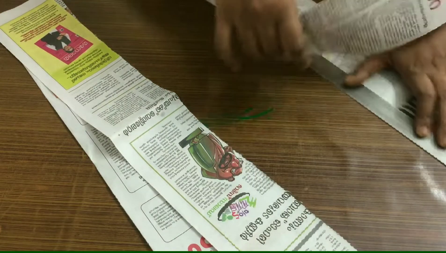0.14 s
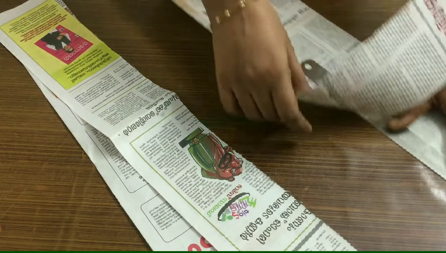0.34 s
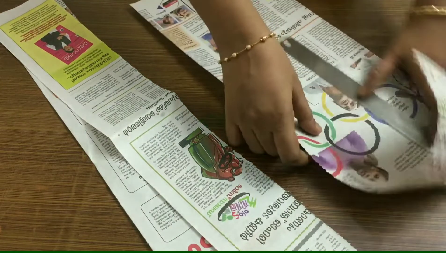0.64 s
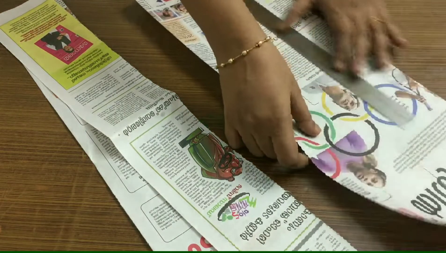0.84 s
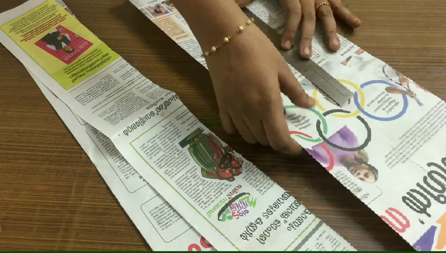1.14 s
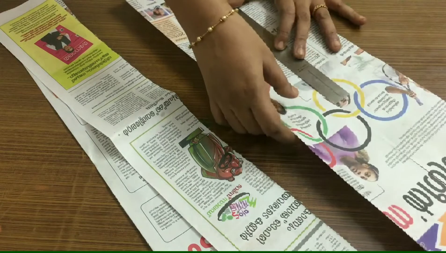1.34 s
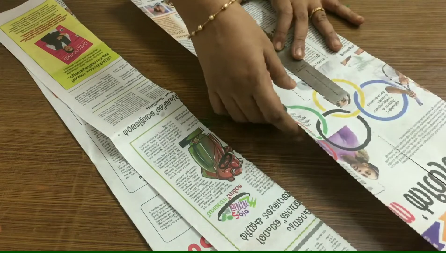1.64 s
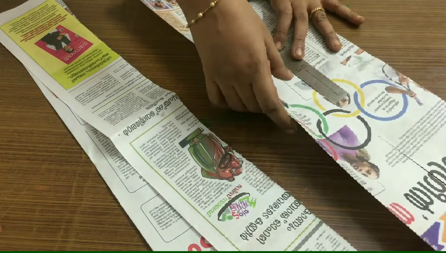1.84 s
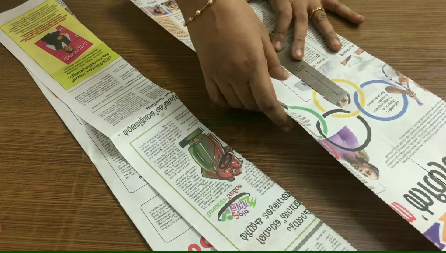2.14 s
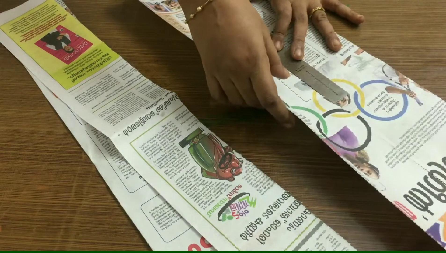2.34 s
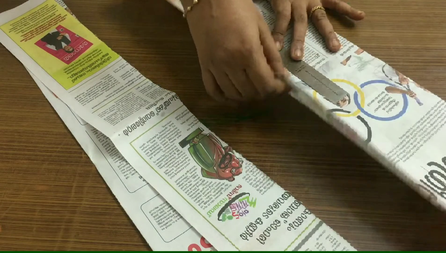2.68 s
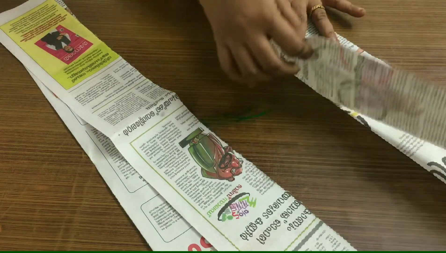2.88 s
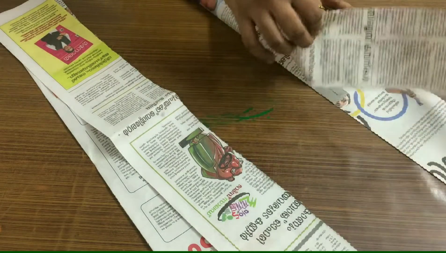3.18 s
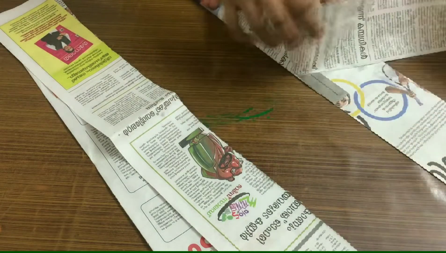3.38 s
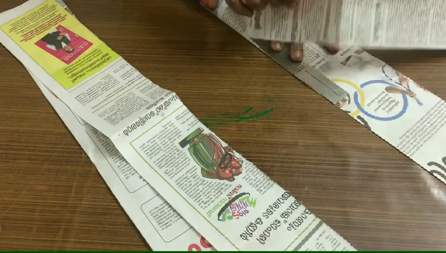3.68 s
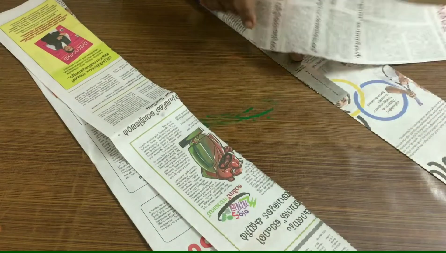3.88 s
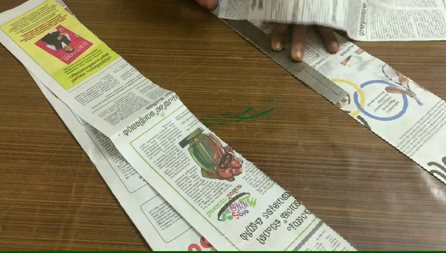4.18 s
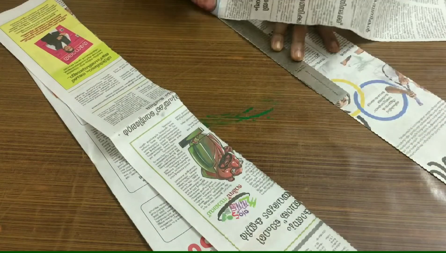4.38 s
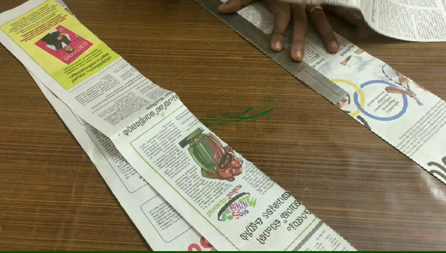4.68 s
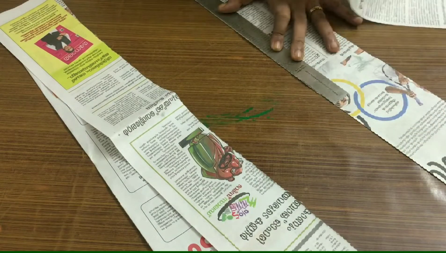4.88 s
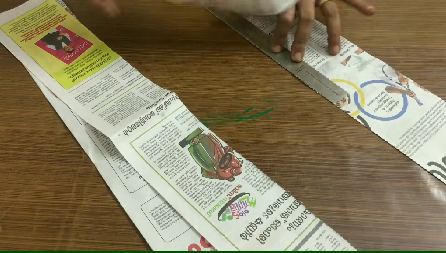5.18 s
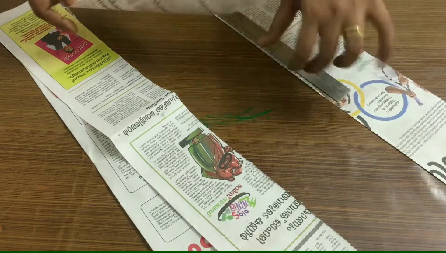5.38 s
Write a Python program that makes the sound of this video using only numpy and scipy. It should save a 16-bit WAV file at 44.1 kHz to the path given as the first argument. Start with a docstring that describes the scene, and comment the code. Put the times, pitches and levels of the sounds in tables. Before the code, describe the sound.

A quiet indoor room with faint low rumble and a short reverberant tail; paper is very close. The sheet slides and rustles at once, pops at 0.18 s, then rips briefly from 0.2 to 0.34 s with a sharp crack. From 0.5 to 1.3 s soft hand landings make low table booms, while the palm smooths the page with airy hiss and a low rub. It fades to near silence from about 1.6 to 3 s, with a couple of tiny ticks and a barely audible low hum near 2.6 s. From 3.1 s the paper crinkles and ticks under fingers. Crisp, fibrous tears follow at 3.52-3.67, 3.94-4.07, 4.32-4.44 and 4.93-5.12 s, with bright snaps and hollow buckling pops around them, strongest near 3.9 s. Crumpling at 4.85 s and small jerks precede the weaker last tear, which ends in a flick. The sheet slides softly around 5.4 s.

```python
"""A bare, quiet room: newspaper is torn along a steel ruler on a wooden table, in five short pulls, close up.
Each pull is a rush of snapping fibres radiated by the free strip, often after a few jerks and with cracks,
and it drags the sheet along. Between pulls the sheet buckles, ticks and slides over the table, and a hand
smooths it flat. Clicks and noise through resonances make the paper, wavering sines the table's boom;
a reverberant tail and a faint rumble with one low drone lie behind."""
import sys
import numpy as np
from scipy import signal
from scipy.fft import rfft, irfft
from scipy.io import wavfile
from scipy.ndimage import uniform_filter1d, map_coordinates

SR = 44100
rng = np.random.default_rng(int(sys.argv[2]) if len(sys.argv) > 2 else 0)


def generate_wav(sig):
    """Save sig (samples, or channels by samples) to the path in sys.argv[1] as 16-bit PCM at SR."""
    pcm = np.round(np.clip(np.atleast_2d(sig).T, -1, 1) * 32767).astype(np.int16)
    wavfile.write(sys.argv[1], SR, pcm)


N = 243431
TIME = np.arange(N) / SR

# pulls on the strip: (start t/s, end t/s, level/dB, rise t/s, sag/dB per s, closing flick/dB,
# sheet drag level/dB)
TEAR_PULLS = [(0.206, 0.336, -22.5, 0.014, 47, -2, -56), (3.517, 3.665, -31, 0.0022, 70, 9, -47.5),
              (3.944, 4.066, -24.5, 0.013, 88.5, -0.5, -49), (4.316, 4.44, -25.5, 0.018, 49.5, -6.5, -50.5),
              (4.932, 5.117, -32.5, 0.011, 8, 7.5, -52.5)]
# resonances of the taut sheet: (f/Hz, width/Hz, boost/dB)
SHEET_RESONANCES = [(1655, 700, 1), (2410, 240, 3), (3934, 130, 4.5), (5600, 170, 4.5), (6810, 460, 2),
                    (8900, 1400, 5.5)]


def from_db(db):
    """Amplitude for a level in dB."""
    return 10 ** (np.asarray(db) / 20)


def rms_one(x):
    """Scale to an rms of 1."""
    return x / np.sqrt(np.mean(x ** 2) + 1e-20)


def at_hz(points, hz):
    """Read a (f/Hz, level/dB) curve, straight over log frequency."""
    points = np.array(points)
    return np.interp(np.log(np.maximum(hz, 1)), np.log(points[:, 0]), points[:, 1])


def drift(rate_hz):
    """Smooth random wandering: noise low-passed at the rate, rms 1."""
    lowpass = signal.butter(2, rate_hz, fs=SR, output="sos")
    noise = rng.standard_normal(N + SR)
    return rms_one(signal.sosfilt(lowpass, noise)[SR:])   # the filter settles for a second first


def colour(x, spectrum, resonances=()):
    """Causal (minimum-phase) filter with the given spectrum and peaks; keeps the power of white noise."""
    size = 8192
    hz = np.arange(size // 2 + 1) * SR / size
    db = at_hz(spectrum, hz)
    for centre, width, top in resonances:
        db = db + top / (1 + (2 * (hz - centre) / width) ** 2)
    cepstrum = irfft(np.log(from_db(db)))[:size // 2]
    cepstrum[1:] *= 2   # folding the cepstrum makes the phase minimal
    response = irfft(np.exp(rfft(cepstrum, size)))
    return signal.oaconvolve(x, response / np.linalg.norm(response))[:N]


def grains(per_s, spread_db, limit=5.9):
    """Random clicks of either sign, their sizes in dB spread exponentially; rms 1."""
    sizes = from_db(spread_db * np.minimum(rng.exponential(1, N), limit))
    signs = rng.choice([-1, 1], N)
    return rms_one(sizes * signs * (rng.random(N) < per_s / SR))


def ring(x, hz, q):
    """One resonance, with a gain of 1 on top."""
    return signal.lfilter(*signal.iirpeak(hz, max(q, 1), fs=SR), x + 1e-18)


def add(out, at, sound, peak_db):
    """Mix a short sound in at the given peak level."""
    part = out[at:at + len(sound)]
    part += (sound * from_db(peak_db) / np.abs(sound).max())[:len(part)]


def swells(rows, shape=1):
    """Gain of movements that rise and fall away; shape 1 is pointed, 2 rounded, more is flat-topped."""
    gains = []
    for s, db, rise_s, fall_s in rows:
        distance = np.maximum((s - TIME) / rise_s, (TIME - s) / fall_s)
        gains.append(from_db(db) * np.exp(-distance ** shape))
    return np.linalg.norm(gains, axis=0)


def held(start, end, rise_s, release_s):
    """Attack, hold and release, with exponential time constants."""
    attack = 1 - np.exp(-np.maximum(TIME - start, 0) / rise_s)
    return attack * np.exp(-np.maximum(TIME - end, 0) / release_s)


def background(rumble_db=-63.5, drone_hz=128, waver_hz=3):
    """The room's steady rumble is filtered noise; a wavering low sine swells and fades once in it."""
    # the room's own rumble: (f/Hz, level/dB per Hz)
    rumble_colour = [(21, -49.5), (40, -7), (85, -10), (180, 0), (286, -10), (360, -3), (490, -16),
                     (602, -13.5), (2800, -23), (16000, -40)]
    # swell of the drone: (t/s, level/dB, rise t/s, fall t/s)
    drone_swell = [(2.56, -60, 0.14, 0.51)]
    phase = 2 * np.pi * np.cumsum(drone_hz + waver_hz * drift(22.0)) / SR
    drone = np.sin(phase) * swells(drone_swell)
    return from_db(rumble_db) * colour(rng.standard_normal(N), rumble_colour) + drone


def room(x, first_s=0.0015, build_s=0.0031, t60_s=0.48, dull_hz=11500):
    """A diffuse tail sets in after a short gap, builds up and dies sooner in the treble."""
    # strength of the reverberation: (f/Hz, level/dB)
    tail_level = [(100, 0.5), (400, -8), (1500, -4.5), (5500, -12), (9000, -12.5), (15000, -4)]
    # slight dip at a low standing wave: (f/Hz, width/Hz, boost/dB)
    standing_wave = [(105.6, 16.9, -1)]
    t = np.arange(SR) / SR
    white, hz = rfft(rng.standard_normal(SR)), np.arange(SR // 2 + 1)
    edges, tail = np.geomspace(50, 18000, num=13), 0
    for low, high in zip(edges, edges[1:]):
        centre = np.sqrt(low * high)
        band_t60_s = t60_s / (1 + (centre / dull_hz) ** 3.0)
        decay = from_db(-60 * t / band_t60_s) * np.clip((t - first_s) / build_s, 0, 1)
        band = irfft(white * (hz >= low) * (hz < high), SR)
        tail = tail + from_db(at_hz(tail_level, centre)) * band * decay / np.linalg.norm(decay)
    return signal.fftconvolve(colour(x, [(1, 0)], standing_wave), tail)[:N]


def pats(waver_hz=18):
    """Soft hands make the table top boom briefly: sines of wavering pitch that swell and fade."""
    # hands landing on the table: (t/s, peak level/dB, swell t/s, f/Hz)
    landings = [(0.498, -43.5, 0.0091, 118), (0.869, -47.5, 0.021, 100.9), (1.123, -58, 0.031, 119),
                (1.252, -49, 0.0099, 105.8)]
    waver = np.cumsum(waver_hz * drift(41.6)) / SR   # in cycles
    out = np.zeros(N)
    for s, peak_db, swell_s, hz in landings:
        boom = np.sin(2 * np.pi * (hz * TIME + waver))
        out += from_db(peak_db) * np.exp(-np.abs(TIME - s) / swell_s) * boom
    return out


def sheet_motion(settle_s=0.24):
    """How strongly the sheet moves: shifted by hand, dragged along by every pull, then settling."""
    # the sheet is shifted over the table: (t/s, level/dB, rise t/s, fall t/s)
    shifts = [(0.01, -45, 0.24, 0.06), (0.6, -53.5, 0.99, 0.13), (1.2, -65.5, 0.32, 0.14),
              (1.56, -68.5, 0.029, 0.25), (2.99, -69.5, 0.064, 0.29), (5.40, -53, 0.027, 0.43)]
    motions = [swells(shifts)]
    for start, end, _, rise_s, _, _, drag_db in TEAR_PULLS:
        motions.append(from_db(drag_db) * held(start, end, rise_s, settle_s))
    return np.linalg.norm(motions, axis=0)


def palm_rub(wander=0.07, wander_per_s=8.0, grip_db=3.5):
    """Rubbing in the hollow under the hand: resonances shift as it moves, flare as skin grips; rms 1."""
    # resonances of the hollow: (f/Hz, width/Hz, level/dB)
    hollow = [(338, 75, -1), (547, 150, -5.5), (1004, 310, -6.5), (2050, 300, -8)]
    out, stretch = 0, np.exp(wander * drift(wander_per_s))
    for hz, width, db in hollow:
        phase = 2 * np.pi * np.cumsum(hz * stretch) / SR
        # two slow noises on a carrier make a narrow band of noise
        band = drift(width / 2) * np.cos(phase) + drift(width / 2) * np.sin(phase)
        out = out + from_db(db + grip_db * drift(20)) * band
    return rms_one(out)


def sliding(flutter_db=1.5):
    """Friction: paper on wood is a stream of tiny catches, skin on paper a hiss and a low rub."""
    # colour of the sheet dragging over the table: (f/Hz, level/dB per Hz)
    paper_colour = [(70, -26), (100, -0.5), (135, 3.5), (249, -5.5), (583, -9), (801, -25), (2170, -8.5),
                    (6150, -8.5), (16000, -29.5)]
    # colour of the palm's hiss: (f/Hz, level/dB per Hz)
    hiss_colour = [(1000, -15), (3000, -9), (7000, -3.5), (10500, -10.5), (15000, -9.5), (17000, -11)]
    # a palm sweeps over the page: (t/s, level/dB, rise t/s, fall t/s)
    palm_sweeps = [(0.66, -53, 0.21, 0.12), (1.0, -55.5, 0.15, 0.34), (1.29, -60, 0.042, 0.068)]
    # the palm presses down and rubs: (t/s, level/dB, rise t/s, fall t/s)
    palm_presses = [(0.52, -51, 0.084, 0.034), (1.1, -53, 0.069, 0.16)]
    drag = sheet_motion() * from_db(flutter_db * drift(66))
    paper = colour(drag * grains(14000, spread_db=-4.0), paper_colour, SHEET_RESONANCES)
    hiss = colour(swells(palm_sweeps, shape=3.2) * rng.standard_normal(N), hiss_colour)
    rub = swells(palm_presses) * palm_rub()
    return paper + hiss + rub


def crumpling(fingers_db=1.5, moving_db=-6, low_hz=620, high_hz=3400, clump_db=3.0, ring_q=2.3, count=12):
    """Small patches, each with its own pitch, give way in clumps, under the fingers and as the sheet moves."""
    # the edge crumples under the fingers: (t/s, level/dB before fingers_db, rise t/s, fall t/s)
    finger_swells = [(3.28, -54, 0.066, 0.04), (3.43, -57.5, 0.024, 0.077), (4.69, -56, 0.022, 0.044),
                     (4.845, -44, 0.015, 0.04)]
    clumps = from_db(clump_db * drift(60))
    pops = np.zeros(N)
    for hz in np.geomspace(low_hz, high_hz, count):
        pops += rms_one(ring(grains(260, spread_db=3.5) * clumps, hz, ring_q))
    pops = rms_one(signal.sosfilt(signal.butter(2, high_hz, fs=SR, output="sos"), pops))
    fingers = from_db(fingers_db) * swells(finger_swells, shape=0.88)
    return pops * (fingers + from_db(moving_db) * sheet_motion())


def buckles(low_hz=650, overtone_ratio=1.57, ring_db=-0.5, ring_q=8.0, kinks_per_s=5000,
            shiver_db=-32, shiver_s=0.035):
    """A patch of loose sheet pops through in a few kinks, rings some cycles at its own pitch, then shivers."""
    # duller pops as the loose sheet buckles: (t/s, peak level/dB, f/Hz, swell t/s)
    buckle_pops = [(0.176, -24.5, 1880, 0.0058), (0.1833, -24, 3530, 0.0025), (0.5506, -41, 1400, 0.0018),
                   (0.5955, -36.5, 2580, 0.0027), (0.7136, -48, 1490, 0.0013), (0.864, -33, 3200, 0.007),
                   (3.19, -38, 2570, 0.0014), (3.213, -36.5, 3200, 0.003), (3.2458, -35.5, 2480, 0.00056),
                   (3.2624, -36, 1890, 0.0012), (3.2875, -35.5, 2810, 0.0012),
                   (3.4169, -37.5, 1400, 0.00235), (3.4242, -37.5, 2430, 0.0013),
                   (3.496, -32, 2140, 0.0017), (3.8005, -35, 2070, 0.0022), (3.9072, -19, 4000, 0.0027),
                   (3.9254, -16, 3660, 0.0017), (4.176, -29.5, 2850, 0.0026), (4.288, -31, 2880, 0.00082),
                   (4.3097, -27.5, 2080, 0.0019), (4.503, -27.5, 1830, 0.0024), (4.525, -31, 3100, 0.0014),
                   (4.69, -36, 2450, 0.00067), (4.7798, -35, 2130, 0.0012), (4.822, -23, 2310, 0.0016),
                   (5.371, -42, 2500, 0.0012)]
    out, t = np.zeros(N), np.arange(SR // 8) / SR
    for s, peak_db, hz, swell_s in buckle_pops:
        swell = t / swell_s * np.exp(1 - t / swell_s)
        shape = swell + from_db(shiver_db) * np.exp(-t / shiver_s)
        kinks = rng.standard_normal(len(t)) * (rng.random(len(t)) < kinks_per_s / SR)
        kinks[round(swell_s * SR)] = 2   # the main kink, at the top of the swell
        patch = signal.butter(3, [low_hz, min(hz * overtone_ratio, 15000)], "band", fs=SR, output="sos")
        pop = signal.sosfilt(patch, shape * kinks)
        add(out, round(s * SR), pop + from_db(ring_db) * ring(pop, hz, ring_q), peak_db)
    return out


def cracks(width_ratio=1.65, body_db=-12, body_hz=(900, 2500)):
    """Bright, very short noise bursts, each around its own pitch, with a little of the sheet's body under."""
    # an edge nicks or a crease flips: (t/s, peak level/dB, 60 dB decay t/s, centre f/Hz)
    crack_times = [(0.25, -14, 0.002, 5000), (0.2836, -6, 0.0088, 5100), (0.475, -32.5, 0.0047, 6460),
                   (1.955, -50, 0.0072, 3000), (2.4549, -44, 0.0053, 7070), (3.0872, -36, 0.016, 4800),
                   (3.3575, -31, 0.0056, 5570), (3.4893, -27.5, 0.0028, 5500), (3.521, -10.5, 0.0024, 7000),
                   (3.555, -15, 0.0012, 6500), (3.572, -15.5, 0.0017, 5660), (3.603, -17, 0.0015, 5040),
                   (3.648, -19.5, 0.002, 4940), (3.9002, -13, 0.0092, 5560), (3.956, -23, 0.008, 6500),
                   (3.978, -8, 0.0025, 5450), (3.9965, -13, 0.0022, 4900), (4.356, -10, 0.0031, 6000),
                   (4.371, -10, 0.0041, 5600), (4.502, -22.5, 0.0017, 4950), (4.8235, -22.5, 0.016, 4650)]
    out, t = np.zeros(N), np.arange(SR // 8) / SR
    body = signal.butter(2, body_hz, "band", fs=SR, output="sos")
    for s, peak_db, length_s, hz in crack_times:
        crackle = rng.standard_normal(len(t)) * from_db(-60 * t / length_s) + 1e-18
        band_hz = [hz / width_ratio, min(hz * width_ratio, 16000)]
        edge = signal.butter(2, band_hz, "band", fs=SR, output="sos")
        crack = signal.sosfilt(edge, crackle) + from_db(body_db) * signal.sosfilt(body, crackle)
        add(out, round(s * SR), crack, peak_db)
    return out


def fibres(per_s, spread_db, slip_db, fuzz_db=-12, slips_per_s=260, slip_s=0.00093):
    """Fibres snap, their strength modulated by slips that start at once and die away; rms near 1."""
    snaps = grains(per_s, spread_db) + from_db(fuzz_db) * rng.standard_normal(N)
    slip_starts = rng.random(N) < slips_per_s / SR
    slips = signal.lfilter([1], [1, -np.exp(-1 / (slip_s * SR))], slip_starts)
    snaps *= from_db(slip_db * np.minimum(rms_one(slips - slips.mean()), 2))
    # the hand feeds energy steadily, however unevenly the fibres let go: level over 25 ms
    return snaps / np.sqrt(uniform_filter1d(snaps ** 2, size=1100) + 1e-9)


def fibre_bundles(per_s=45, low_hz=1800, high_hz=11000, ring_q=2.5, count=6):
    """Coarse bundles of fibres break one by one, each with a short ring at its own pitch; rms 1."""
    out = np.zeros(N)
    for hz in np.geomspace(low_hz, min(high_hz, 15000), count):
        out += ring(grains(per_s, spread_db=1.5), hz, ring_q)
    return rms_one(out)


def jerks(rise_s=0.00069, release_s=0.004):
    """The taut edge gives way a little at a time: short bursts of snapping fibres."""
    # jerks as a tear gets going or gives its last: (start t/s, length t/s, level/dB)
    jerk_bursts = [(0.237, 0.011, -24), (3.52, 0.0085, -25), (3.541, 0.0061, -27), (3.573, 0.0089, -30),
                   (3.652, 0.01, -35.5), (3.933, 0.009, -25.5), (4.85, 0.0094, -35), (4.881, 0.0095, -27),
                   (4.895, 0.0076, -36), (4.9155, 0.0063, -25), (4.928, 0.0029, -27.5),
                   (4.951, 0.0058, -28.5), (5.111, 0.016, -37)]
    # colour of the jerks: (f/Hz, level/dB per Hz)
    burst_colour = [(75, -30), (115, -10), (500, -1.5), (2500, -4), (4700, -7.5), (6600, 1), (9300, -1.5),
                    (10600, -11.5), (16000, -9.5)]
    force = sum(from_db(db) * held(s, s + length_s, rise_s, release_s) for s, length_s, db in jerk_bursts)
    snaps = fibres(per_s=7000, spread_db=2.0, slip_db=0) * force
    return colour(snaps, burst_colour, SHEET_RESONANCES)


def near_echoes(x, gain=.38):
    """Table top and moving sheet throw the sound back within milliseconds: a shifting, hollow colour."""
    out = x.copy()
    dulled = signal.sosfilt(signal.butter(1, 10000, fs=SR, output="sos"), x)
    for k, lag_s in enumerate((.0015, .0026, .0041, .0059)):
        path = lag_s * SR * np.exp(.2 * drift(1.5))   # wandering delay in samples
        echo = map_coordinates(dulled, [np.arange(N) - path], order=3)
        out += gain * (-1) ** k * echo
    return out * np.std(x) / np.std(out)   # overall level stays


def tearing(treble_lift_db=0.5, treble_hz=4500, lowest_hz=97, flicker_db=2.0, flick_s=0.0035,
            release_s=0.0071):
    """The free strip radiates the snapping; a pull sags, flickers and brightens a little, up to a wrist flick."""
    # the free strip is bent differently in each pull; its colour: (f/Hz, level/dB per Hz)
    strip_1 = [(108, -4.5), (244, -13.5), (293, 0), (872, -8), (1150, -4), (2430, -4.5), (3330, -8),
               (5370, -3.5), (9700, -14.5), (16000, -20.5)]
    strip_2 = [(105, -4), (145, 0.5), (744, -14), (1230, -12.5), (2430, -13), (3110, -7.5), (4800, -10.5),
               (6300, -7), (10600, -24.5), (14000, -12.5), (16000, -30)]
    strip_3 = [(103, -3.5), (170, -8.5), (293, -5.5), (664, -11), (1370, -9), (2840, -11), (8860, -12),
               (16000, -25)]
    strip_4 = [(100, -3), (190, -25), (370, 2), (800, -11.5), (1500, -1), (2100, -4.5), (3100, -12),
               (3750, 0), (4400, -6.5), (5500, -2.5), (8600, -7.5), (10600, -15.5), (16000, -14)]
    strip_5 = [(95, -2), (190, -17), (400, -6.5), (620, -1), (1700, -6.5), (2900, -8.5), (4800, -7.5),
               (6000, -3), (7300, -7.5), (10600, -14.5), (16000, -21)]
    # fibres in each pull: (snaps per s, size spread/dB, stick-slip depth/dB, coarse bundles level/dB)
    fibre_texture = [(6360, 1.5, 2, -11), (2960, 4.5, 3.5, -4), (3660, 2, 2, -8.5), (4240, 3.5, -1.5, -12),
                     (3940, 3, 3, -5)]
    out, bundles = np.zeros(N), fibre_bundles()
    treble = signal.butter(1, min(treble_hz, 15000), "high", fs=SR, output="sos")
    strips = (strip_1, strip_2, strip_3, strip_4, strip_5)
    for pull, strip, (*texture, bundles_db) in zip(TEAR_PULLS, strips, fibre_texture):
        start, end, db, rise_s, sag_db_per_s, flick_db, _ = pull
        t = np.clip(TIME, start, end)
        # a negative flick eases off instead
        force_db = db - sag_db_per_s * (t - start) + flick_db * np.exp((t - end) / flick_s)
        force = from_db(force_db) * held(start, end, rise_s, release_s)
        lift_db = treble_lift_db * np.interp(TIME, [start, end], [-1, 1])
        brightness = from_db(lift_db + flicker_db * drift(36))
        snaps = (fibres(*texture) + from_db(bundles_db) * bundles) * force + 1e-18
        snaps = snaps + (brightness - 1) * signal.sosfilt(treble, snaps)
        out += colour(snaps, strip, SHEET_RESONANCES)
    return signal.sosfilt(signal.butter(4, lowest_hz, "high", fs=SR, output="sos"), out)


def scene():
    """Paper and hands close to the microphone, the room behind them."""
    paper = tearing() + crumpling() + sliding()
    knocks = jerks() + cracks() + buckles() + pats()
    return (near_echoes(paper) + knocks + room(paper + knocks) + background())[None]


def record(dry, cutoff_hz=16050):
    """The top is cut steeply."""
    return signal.sosfilt(signal.ellip(10, .2, 80, cutoff_hz, fs=SR, output="sos"), dry)


dry = scene()
out = record(dry)
generate_wav(out)
```